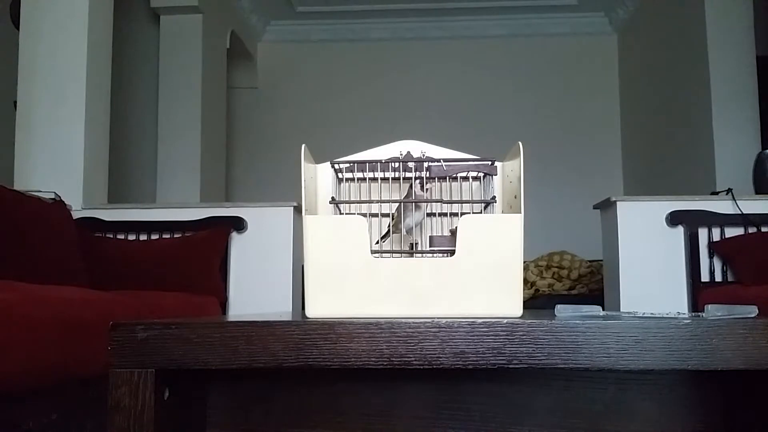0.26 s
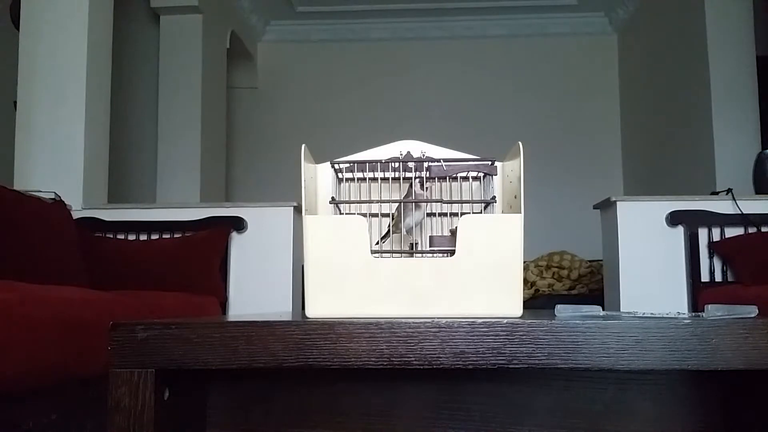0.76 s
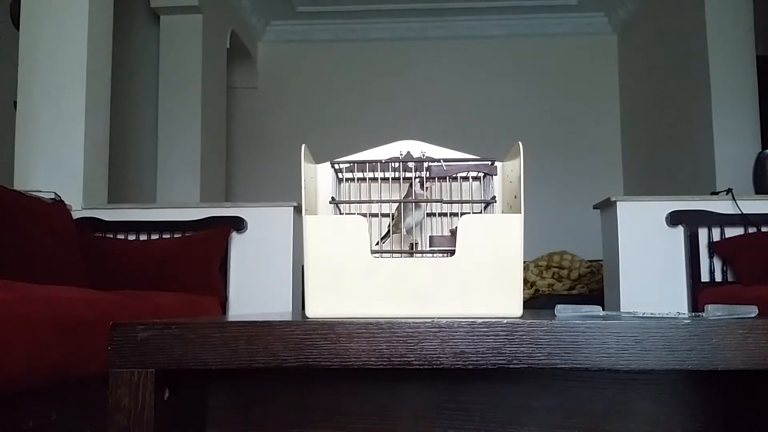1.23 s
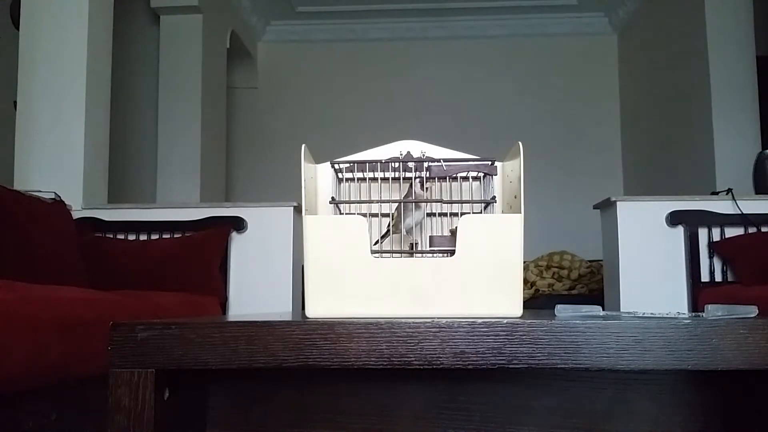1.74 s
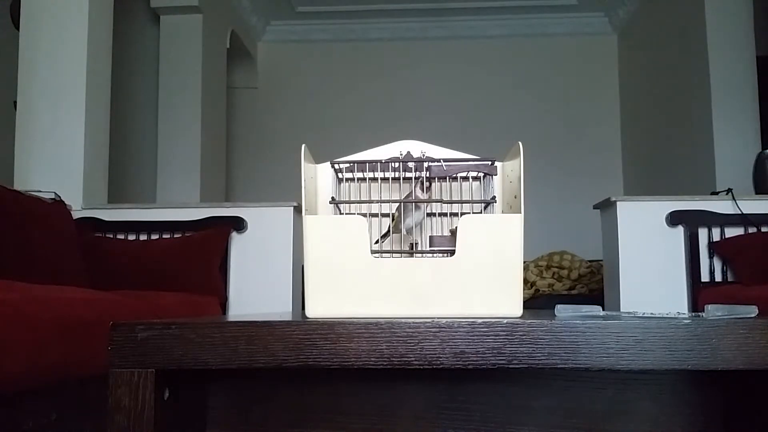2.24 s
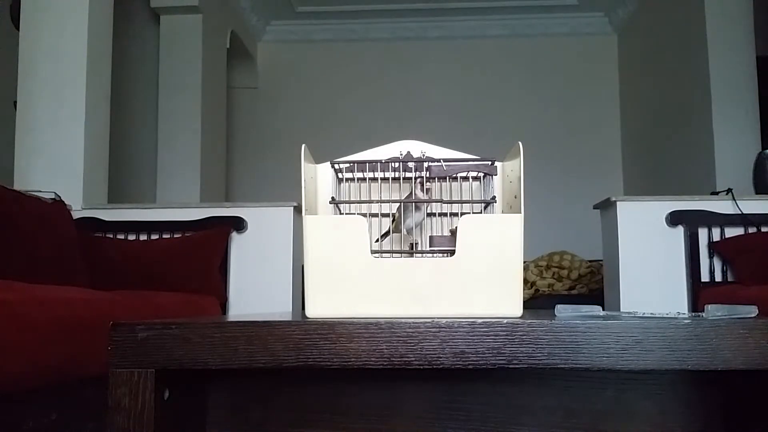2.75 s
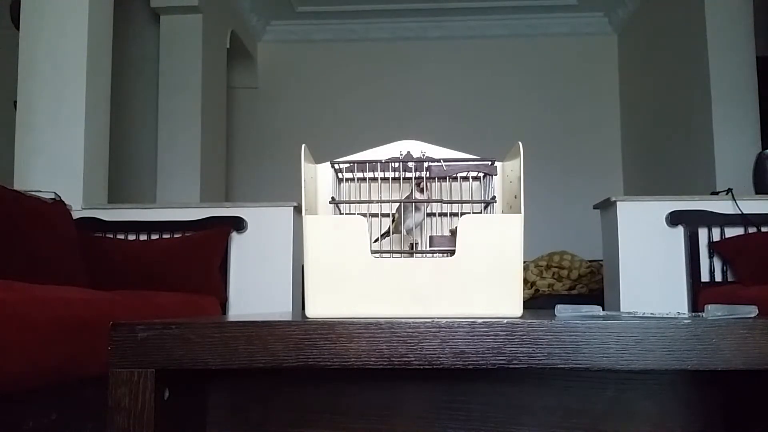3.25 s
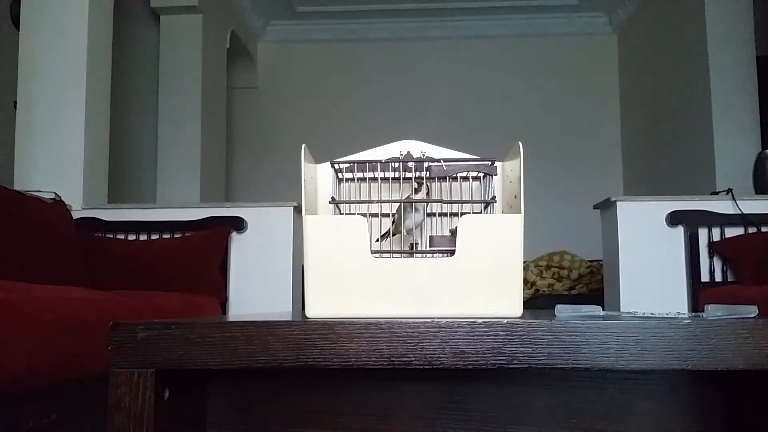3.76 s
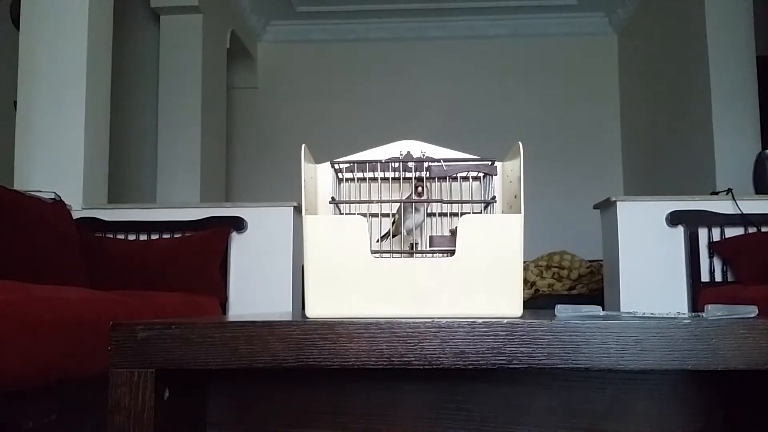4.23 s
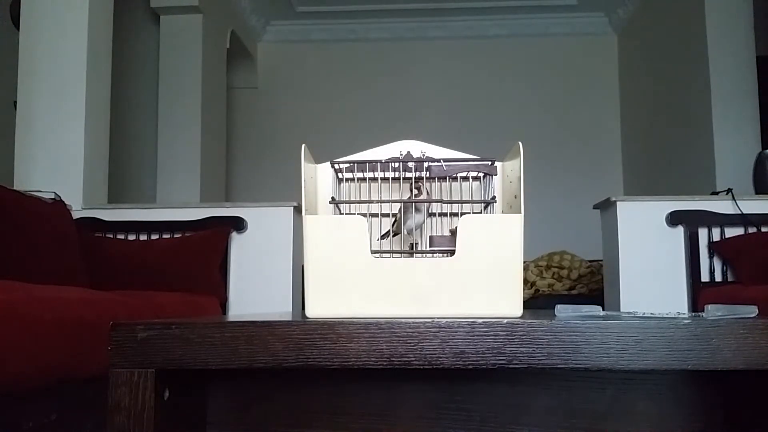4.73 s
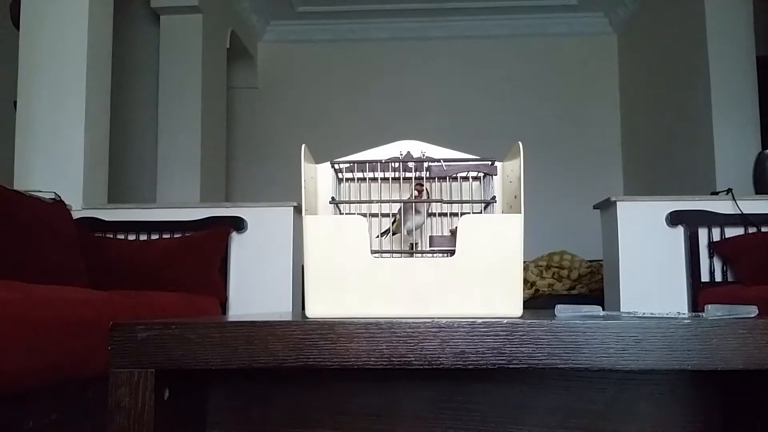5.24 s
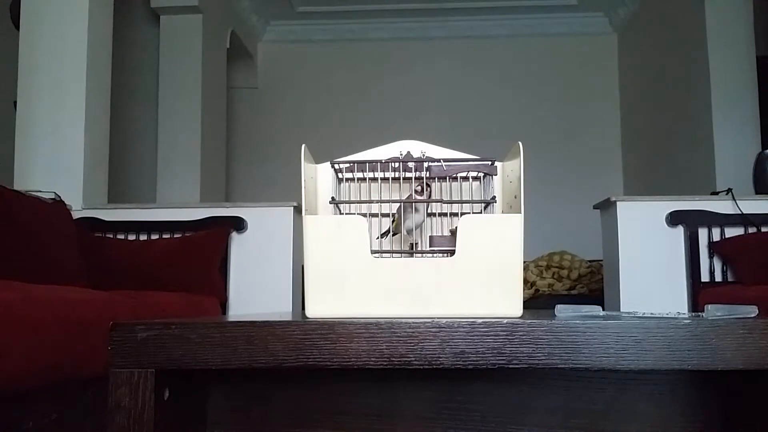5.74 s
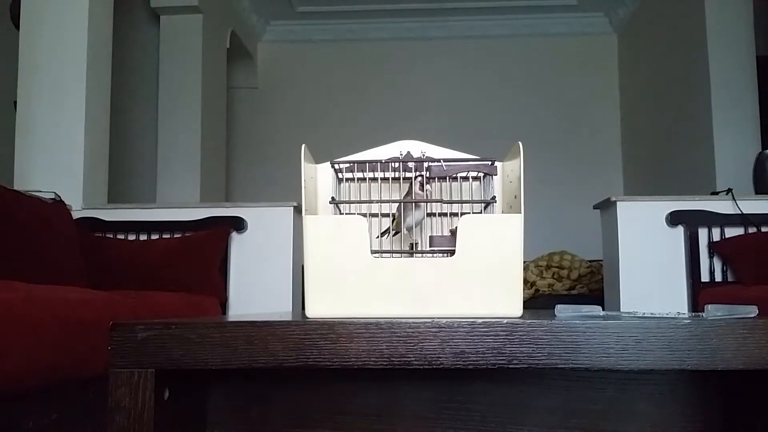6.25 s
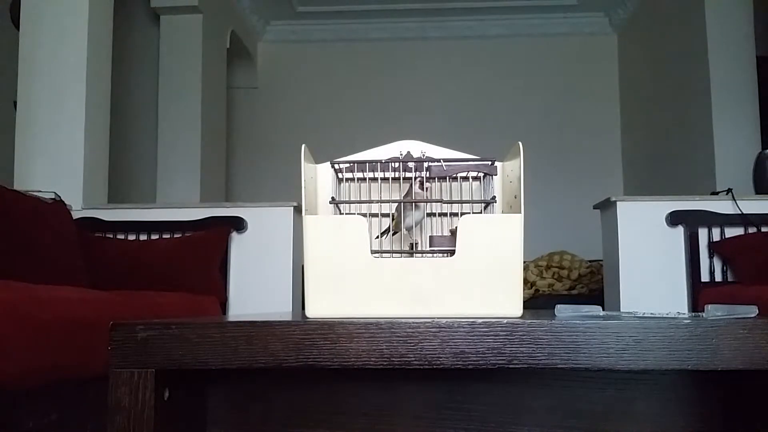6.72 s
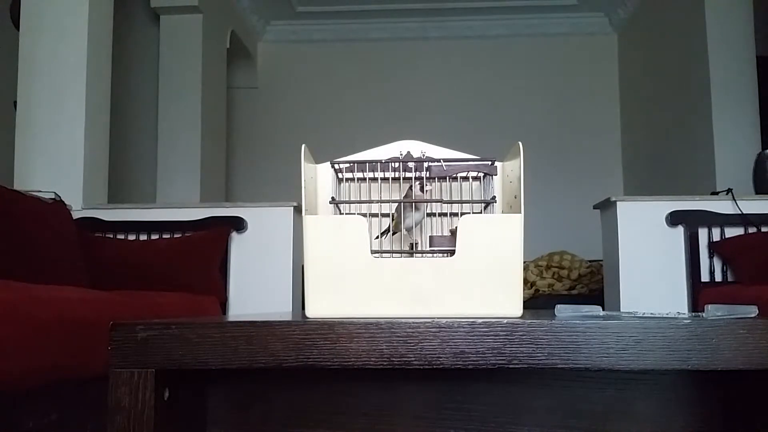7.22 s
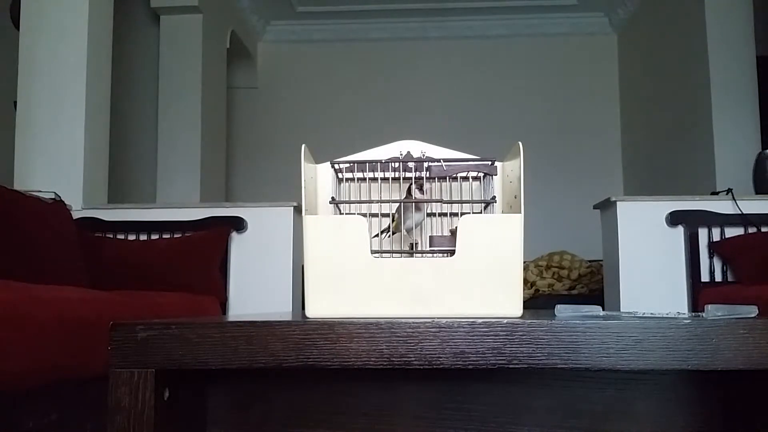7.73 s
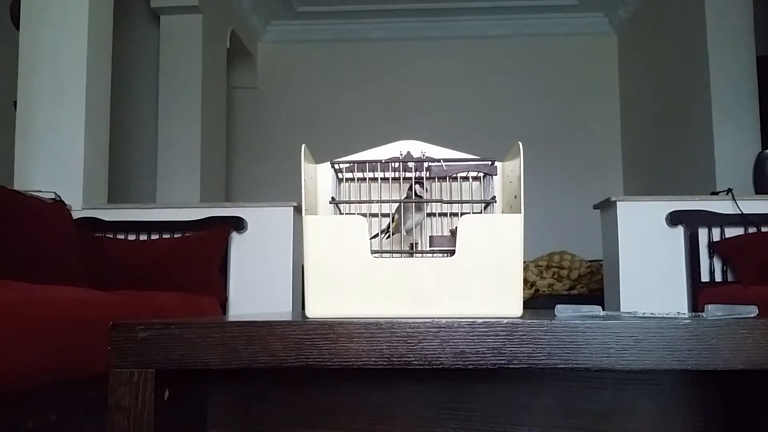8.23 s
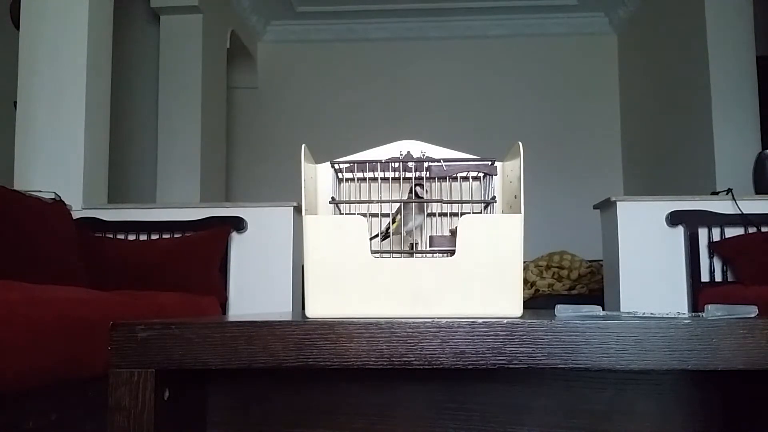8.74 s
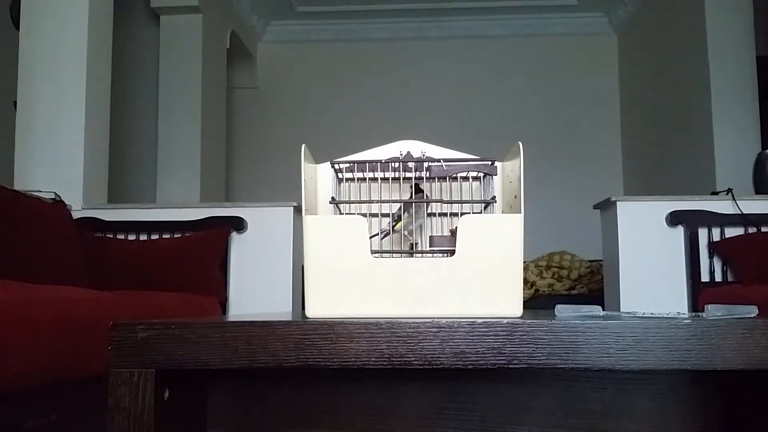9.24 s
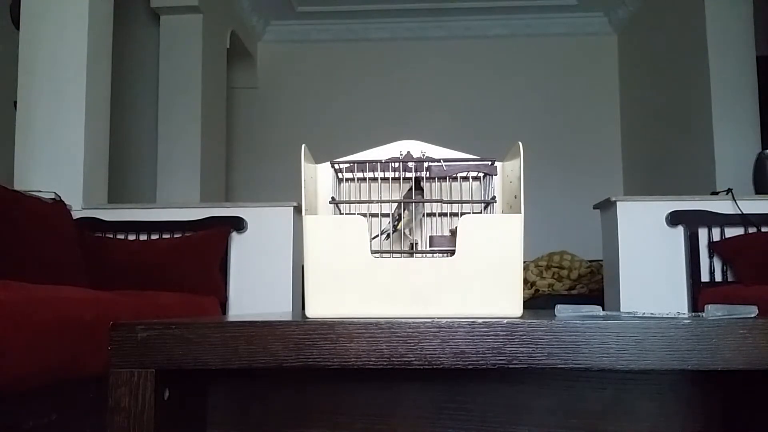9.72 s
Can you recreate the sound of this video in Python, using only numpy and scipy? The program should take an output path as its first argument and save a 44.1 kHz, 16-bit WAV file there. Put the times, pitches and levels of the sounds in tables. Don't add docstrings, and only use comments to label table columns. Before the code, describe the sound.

The first 1.6 seconds hold only faint hiss and muffled street rumble, with a low engine hum emerging. From about 1.7 seconds a small caged finch sings: three spaced groups of short rising chips and falling whistles, roughly 2.5 to 6.5 kHz, each louder, then from 2.6 quick hooks and dives, long downward slurs around 3.2 to 3.9, and sharp upward leaps with answering rises until 4.55. Dry beak and perch ticks are tucked between notes. Outside, a heavy vehicle's hum climbs, drops in pitch at 3.5 with a gear change, then climbs steadily from about 5 onward. Between 4.6 and 7.5 the bird is silent apart from a tiny tick, and the hiss recedes. The second song runs 7.5 to 9.65, softer and more reverberant, again accelerating, ending in tired falling slurs. Hard walls give a short bright echo; hiss and rumble lift with each song.

```python
import sys
import numpy as np
from scipy import signal
from scipy.io import wavfile
from scipy.ndimage import uniform_filter1d

SR = 44100
rng = np.random.default_rng(int(sys.argv[2]) if len(sys.argv) > 2 else 0)


def natural_amplitude(level_db):
    exponent = np.asarray(level_db, float) / 20
    return 10 ** exponent


def dump_mix(stems):
    frames = np.atleast_2d(stems).T
    limited = np.clip(frames, -1, 1)
    pcm = np.round(limited * 32767).astype(np.int16)
    wavfile.write(sys.argv[1], SR, pcm)


N = 440118
TURN_S = 6


def evened(x):
    return x / np.sqrt(np.mean(x ** 2) + 1e-20)


def read(points, hz):
    f, value = np.transpose(points)
    return np.interp(np.log(hz + 1), np.log(f + 1), value)


def add(mix, s, sound):
    part = mix[round(s * SR):][:len(sound)]
    part += sound[:len(part)]


def curves(rows):
    s, *columns = np.transpose(rows)
    t = np.arange(s[0], s[-1], 1 / SR)
    return s[0], [np.interp(t, s, c) for c in columns]


def drift(length, top_hz):
    t = np.arange(length)[::64] / SR
    slow = sum(np.sin(2 * np.pi * (f * t + rng.random())) for f in np.geomspace(top_hz / 8, top_hz, num=8))
    return np.interp(np.arange(length), np.arange(length)[::64], slow / 2)


def patchwork(shape, rows, columns):
    rough = uniform_filter1d(rng.standard_normal(shape), size=rows, axis=0)
    return evened(uniform_filter1d(rough, size=columns, axis=1))


def noise(spectrum, patchy_db):
    hz = np.fft.rfftfreq(1024, 1 / SR)
    a, b = rng.standard_normal((2, 513, N // 256 + 5))
    level_db = read(spectrum, hz)[:, None] + patchy_db * patchwork(a.shape, 10, 14)
    return evened(signal.istft((a + 1j * b) * natural_amplitude(level_db), nperseg=1024, noverlap=768)[1][:N])


def gate_opening(t):
    # starts to open t/s, starts to shut t/s
    spans = [
        (1.5, 4.62),
        (7.4, 9.6),
    ]
    open_s, shut_s = .5, .2
    return sum(np.clip(np.minimum((t - a) / open_s, 1 - (t - b) / shut_s), 0, 1) for a, b in spans)


def room_hiss(t, gate):
    # f/Hz, density/dB
    hiss = [(180, -31.5), (300, -4), (342, -14), (423, -14.5), (490, -9), (814, -12), (1130, -10),
            (4050, -22), (13800, -26), (15000, -28)]
    shut_db = -72 + .75 * t
    open_db = -58.5
    return natural_amplitude(shut_db + gate * (open_db - shut_db) + 3.5) * noise(hiss, patchy_db=.5)


def street_rumble(t, gate):
    # f/Hz, density/dB
    rumble = [(24, -41), (40, -1.5), (219, -7.5), (253, 2.5), (325, -25.5), (379, -6.5), (450, -27),
              (580, -55.5), (990, -120)]
    # t/s, level/dB
    traffic = [(0, -60.5), (1.5, -60.5), (2.7, -54), (4.7, -62), (6, -56.5), (7.4, -52.5), (8, -58),
               (9.98, -51)]
    gated_db = 5
    return natural_amplitude(np.interp(t, *np.transpose(traffic)) + gated_db * gate) * noise(rumble, patchy_db=1.97)


def gear(rows, column):
    # multiple of crank rate, low gear level/dB, later gears level/dB
    orders = [(1.33, -11.5, -5.5), (2.001, 4, -4.5), (3, -1, 4.5), (4, -13, -2.5), (5, -0.5, -3),
              (6, 0.4, 1.5), (7, -4.5, -1), (8, -0.5, -10), (9, -11.5, -15.5), (10, -15, -10.5)]
    # f/Hz, level/dB
    walls = [(55, -3.5), (74, 8.5), (92, 2.5), (108, 2), (130, 1.5), (155, -2.5), (178, -1), (200, -1),
             (250, 4.5), (290, 1.5), (340, -12.5), (450, -13)]
    # t/s, f/Hz, level/dB
    swells = [(2.2, 100, -5), (2.75, 190, -4), (2.1, 64, -7), (2.55, 73, 3), (3.15, 85, -5), (3.3, 255, 2),
              (4.3, 83, 6), (5.2, 182, 7), (6.9, 400, 8), (6.4, 113, .5), (7.0, 245, 6), (7.8, 270, 4),
              (8.05, 62, 9), (8.5, 295, 3), (8.9, 152, 6), (9.6, 72, -5), (1.7, 120, 6), (8.9, 101, 7),
              (9.1, 258, 4), (9.5, 215, 6), (5.6, 103, 6), (6.35, 224, 6), (6.2, 255, 4), (5.85, 243, 4),
              (7.3, 295, 5), (2.25, 275, 5), (2.6, 225, 4), (2.75, 117, 3), (7.6, 395, 6), (4.5, 200, -6),
              (4.6, 115, -6), (6.6, 195, 3), (1.3, 210, -5), (3.38, 80, 7), (3.85, 77, -4), (2.25, 68, -3),
              (9.5, 214, 4), (8.85, 100, 4), (7.0, 244, 3), (6.3, 112, 4), (9.3, 156, 3)]
    swell_s, swell_hz = .3, 12
    s, (crank_hz, load_db) = curves(rows)
    turn = 2 * np.pi * np.cumsum(crank_hz) / SR
    hum = np.zeros(len(turn))
    t = s + np.arange(len(turn)) / SR
    for k, *db in orders:
        waver_db = 2.2 * drift(len(turn), top_hz=2.8)
        for at, hz, lift_db in swells:
            waver_db += lift_db * np.exp(-((t - at) / swell_s) ** 2 - ((k * crank_hz - hz) / swell_hz) ** 2)
        level_db = load_db + db[column] + read(walls, k * crank_hz) + waver_db
        hum += natural_amplitude(level_db) * np.sin(k * turn + 2 * np.pi * rng.random())
    return s, hum * signal.windows.tukey(len(turn), .04)


def heavy_vehicle():
    # t/s, crank f/Hz, load level/dB
    gears = [
        [(.8, 25.27, -77), (1.5, 28.56, -66.5), (2.25, 34.3, -53), (2.85, 39.42, -49.5), (3.2, 43, -51),
         (3.5, 43, -60)],
        [(3.5, 24.27, -65), (4.5, 28.4, -58), (4.85, 29.2, -65), (5.4, 30.3, -63), (5.75, 30.9, -72)],
        [(5.1, 31, -72), (5.5, 33.2, -64), (6, 35.7, -62.5), (7, 40.8, -60.5), (8, 46.33, -56),
         (9.2, 52.27, -55.5), (9.98, 54.8, -61)],
    ]
    vehicle = np.zeros(N)
    for column, rows in enumerate(gears):
        add(vehicle, *gear(rows, min(column, 1)))
    return vehicle


def room(column):
    # f/Hz, t60/s
    decay = [(2500, .44), (3700, .39), (4500, .4), (7000, .35), (12000, .28)]
    # f/Hz, first song level/dB, turned away level/dB
    wet = [(2500, -9, -6.5), (3100, -11, -8.5), (3750, -5.5, -4), (4400, -11, -6.5), (5200, -8, -6),
           (6000, -10, -6), (6500, -12.5, -7), (9000, -3, -1)]
    # delay t/s, first song level/dB, second song level/dB
    echoes = [(.0021, -17, -18), (.0044, -20, -16), (.0057, -16, -17), (.0083, -20, -20), (.0127, -11, -17),
              (.0149, -16, -22), (.0158, -22, -16), (.019, -16, -22), (.030, -18, -22), (.0322, -18, -20)]
    patchy_db, early_db, early_s = 2.5, 2, .04
    taps = np.zeros(SR)
    at = np.arange(300, SR - 20, 20)
    taps[at + rng.integers(0, 20, len(at))] = rng.choice([-1., 1.], len(at))
    hz, t, z = signal.stft(taps, SR, nperseg=256)
    wet_db = read([(f, db[column]) for f, *db in wet], hz)[:, None]
    wet_db = wet_db + patchy_db * patchwork(z.shape, 3, 6) + early_db * np.exp(-t / early_s)
    decay_db = 60 * t / read(decay, hz)[:, None]
    path = signal.istft(z * natural_amplitude(wet_db - decay_db), SR, nperseg=256)[1]
    path /= np.sqrt(SR / 20 * .03)
    path[0] += 1
    for s, *db in echoes:
        path[round(s * SR)] += natural_amplitude(db[column])
    return path


def tick(s, hz, db, swell_s):
    t = np.arange(SR // 40) / SR
    window = np.hanning(round(.75 * swell_s * SR))
    rough = evened(signal.convolve(rng.standard_normal(len(t)), window, "same"))
    envelope = (t / swell_s) ** 2 * np.exp(2 - 2 * t / swell_s)
    return s, natural_amplitude(db) * envelope * rough * np.sin(2 * np.pi * hz * t)


def note(row, pitch, breath):
    # f/Hz, level/dB
    windpipe = [(2500, -.1), (3100, 1.5), (3550, -1.5), (4000, .1), (4500, .1), (5000, -1.5), (5600, .1),
                (6400, -.1)]
    # t/s, level/dB
    beak = [(1.6, 0.3), (3.0, 2.5), (3.4, -1), (3.95, -3), (4.02, 5), (4.6, 3), (7.5, 0.3), (8.4, 0.6),
            (9.1, 5), (9.6, 8)]
    # f/Hz, level/dB
    beak_colour = [(5500, 1), (7000, 3), (7900, -5), (8900, -1.5), (10200, 3), (12500, 2.5), (14000, 6),
                   (14800, 3)]
    # multiple of whistle, level/dB
    overtones = [(2, -40), (3, -49)]
    s, length_s, from_hz, to_hz, level_db = row
    bend_s, into_s, out_s, creep = pitch
    rise_s, rise_db, dip_s, dip_db, swell, fade, fade_db = breath
    lead = 88
    t = np.arange(-lead, round(length_s * SR)) / SR
    rise = rise_db * np.clip(1 - t / rise_s, 0, 1)

    bend = np.tanh((t - bend_s) / (2 * np.where(t < bend_s, into_s, out_s)))
    done = (bend - bend[lead]) / (bend[-1] - bend[lead])
    hz = from_hz + (to_hz - from_hz) * done + 1000 * creep * (t - length_s * done)
    hz -= 250 * (from_hz > max(to_hz, 5300)) * np.exp(-np.maximum(t, 0) / .004)

    dip_width_s = .006
    db = level_db + rise + dip_db * np.exp(-((t - dip_s) / dip_width_s) ** 2) + read(windpipe, hz)
    db += 1000 * swell * (t - length_s / 2) + fade_db * np.clip(1 - (1 - t / length_s) / fade, 0, 1)

    flutter_hz, flutter_db, flutter_bend = 62, 1.2, .004
    chance = rng.random()
    tremor = np.sin(2 * np.pi * (flutter_hz * (.7 + .6 * chance) * t + 7 * chance))
    db = db + flutter_db * tremor
    hz = hz * (1 + flutter_bend * tremor)
    turn = 2 * np.pi * (np.cumsum(hz) / SR + chance)

    beak_db = np.interp(s, *np.transpose(beak)) - 3.5 * np.log2(hz / 4000)
    beak_db += 1000 * -.15 * (t - .01) - .45 * rise
    tone = np.sin(turn)
    for k, d in overtones:
        tone = tone + natural_amplitude(d + beak_db + read(beak_colour, k * hz)) * np.sin(k * turn)
    edge = np.clip(np.minimum((t - t[0]) / .006, (t[-1] - t) / .004), 0, 1)
    edge = np.sin(np.pi / 2 * edge) ** 2
    return s + t[0], np.sqrt(2) * natural_amplitude(uniform_filter1d(db, size=90, mode="nearest")) * edge * tone


def rising_notes():
    # start t/s, length/s, from f/Hz, to f/Hz, level/dB
    chips = [
        (1.67, 0.029, 2590, 3076, -27.5),
        (1.966, 0.033, 2580, 3080, -20.5),
        (2.296, 0.037, 2604, 3072, -15.0),
        (7.544, 0.028, 2610, 3071, -25.5),
        (7.858, 0.031, 2650, 3091, -26.5),
        (8.185, 0.036, 2610, 3091, -25.5),
    ]
    # start t/s, length/s, from f/Hz, to f/Hz, level/dB
    flicks = [
        (2.593, .02, 2770, 3231, -13.5),
        (2.764, .021, 2580, 2953, -23),
        (2.939, .022, 2700, 2990, -21),
        (8.501, .017, 2910, 3189, -21.5),
        (8.677, .019, 2580, 3052, -29),
        (8.856, .019, 2560, 2980, -31),
        (9.047, .02, 2580, 2930, -24),
    ]
    # start t/s, length/s, from f/Hz, to f/Hz, level/dB
    graces = [
        (1.85, 0.016, 2760, 2821, -45.0),
        (3.116, 0.024, 2520, 2637, -35.0),
        (3.315, 0.024, 2522, 2633, -38.5),
        (3.526, 0.024, 2420, 2629, -40.0),
        (3.768, 0.026, 2300, 2449, -45.5),
        (9.24, 0.025, 2390, 2580, -34.0),
        (9.475, 0.024, 2430, 2554, -41.5),
    ]
    # start t/s, length/s, from f/Hz, to f/Hz, level/dB
    rises = [
        (1.745, 0.04, 3500, 3716, -29.0),
        (2.058, 0.056, 3450, 3737, -20.5),
        (2.376, 0.044, 3330, 3767, -17.0),
        (7.618, 0.027, 3550, 3696, -31.0),
        (7.946, 0.049, 3400, 3732, -21.5),
        (8.27, 0.059, 3450, 3810, -18.5),
        (2.62, 0.022, 3760, 4000, -19.5),
    ]
    # start t/s, length/s, from f/Hz, to f/Hz, level/dB
    hooks = [
        (8.516, 0.036, 3200, 3995, -15.5),
        (2.787, 0.043, 3140, 3987, -13.5),
        (2.963, 0.041, 3040, 3940, -15.5),
    ]
    # start t/s, length/s, from f/Hz, to f/Hz, level/dB
    flat_hooks = [
        (8.701, 0.041, 3200, 3921, -16.5),
        (8.882, 0.043, 3200, 3903, -17.5),
        (9.07, 0.044, 3150, 3940, -21.5),
    ]
    # start t/s, length/s, from f/Hz, to f/Hz, level/dB
    scoops = [
        (3.142, 0.043, 2950, 3661, -17.5),
        (3.342, 0.039, 2850, 3574, -16.0),
        (3.555, 0.043, 2800, 3412, -16.5),
        (3.797, 0.042, 3000, 3436, -18.0),
        (9.272, 0.047, 3010, 3522, -17.0),
        (9.5, 0.052, 2900, 3416, -21.5),
    ]
    # start t/s, length/s, from f/Hz, to f/Hz, level/dB
    answers = [
        (4.089, 0.061, 2910, 3956, -17.0),
        (4.295, 0.056, 2860, 3934, -17.0),
        (4.504, 0.054, 2960, 3893, -18.0),
    ]
    # start t/s, length/s, from f/Hz, to f/Hz, level/dB
    crests = [
        (2.616, .042, 3350, 4230, -12.5),
    ]
    return [(chips, (.007, .005, .004, .5), (.015, -17, .014, -1, .12, .2, -3)),
            (flicks, (.004, .005, .005, 2.5), (.009, -16, .011, -.5, -.03, .3, -5)),
            (graces, (.003, .003, .003, .5), (.009, -18, .009, .5, .05, .2, -2.5)),
            (rises, (.011, .005, .005, .1), (.0095, -17, .022, -3, .03, .2, -3)),
            (hooks, (.0095, .0036, .0033, .7), (.018, -12, .016, -2.5, .12, .15, -2.5)),
            (flat_hooks, (.01, .004, .0045, .3), (.022, -17, .024, -.5, .03, .25, -5)),
            (scoops, (.008, .0036, .0036, -.5), (.0075, -17, .024, -3.5, -.03, .2, -2.5)),
            (answers, (.011, .0065, .0065, 2.5), (.006, -18, .023, -6, -.05, .2, -4)),
            (crests, (.009, .0035, .0026, -7.5), (.014, -16, .03, -.1, -.03, .2, -3))]


def high_notes():
    # start t/s, length/s, from f/Hz, to f/Hz, level/dB
    steps = [
        (1.823, 0.049, 6090, 5584, -24.5),
        (2.137, 0.047, 6300, 5802, -19.5),
        (2.452, 0.044, 6420, 5791, -17.5),
        (7.703, 0.051, 6180, 5597, -30.0),
        (8.033, 0.052, 6200, 5589, -21.0),
        (8.352, 0.053, 6270, 5895, -18.0),
    ]
    # start t/s, length/s, from f/Hz, to f/Hz, level/dB
    falls = [
        (1.876, 0.049, 5210, 4364, -18.5),
        (7.763, 0.042, 4890, 4314, -19.0),
    ]
    # start t/s, length/s, from f/Hz, to f/Hz, level/dB
    slides = [
        (2.185, 0.065, 5230, 4313, -15.0),
        (2.497, 0.057, 5200, 4398, -14.0),
        (8.079, 0.061, 4950, 4364, -20.0),
        (8.397, 0.063, 5190, 4465, -20.5),
    ]
    # start t/s, length/s, from f/Hz, to f/Hz, level/dB
    clipped = [
        (3.205, 0.045, 5500, 4600, -14.0),
    ]
    # start t/s, length/s, from f/Hz, to f/Hz, level/dB
    swoops = [
        (2.674, 0.057, 6180, 4777, -17.5),
        (2.848, 0.066, 6200, 4947, -17.5),
        (3.022, 0.053, 6430, 4800, -15.5),
    ]
    # start t/s, length/s, from f/Hz, to f/Hz, level/dB
    dives = [
        (8.943, 0.06, 6200, 4850, -20.0),
        (9.132, 0.057, 6250, 4876, -24.0),
    ]
    # start t/s, length/s, from f/Hz, to f/Hz, level/dB
    slurs = [
        (3.402, 0.074, 5430, 4367, -12.5),
        (3.612, 0.102, 5280, 4378, -12.5),
        (3.855, 0.09, 5380, 4344, -13.0),
    ]
    # start t/s, length/s, from f/Hz, to f/Hz, level/dB
    drops = [
        (8.533, 0.042, 4450, 4116, -19.5),
        (8.76, 0.017, 6200, 5859, -25.5),
        (8.604, 0.04, 5500, 4874, -15.0),
        (8.778, 0.036, 5550, 4766, -19.0),
    ]
    # start t/s, length/s, from f/Hz, to f/Hz, level/dB
    sighs = [
        (9.334, 0.091, 5380, 4470, -21.0),
        (9.563, 0.085, 5050, 4218, -25.5),
    ]
    # start t/s, length/s, from f/Hz, to
    # f/Hz, level/dB
    pips = [(2.672, .016, 4500, 4650, -21), (2.846, .012, 4320, 4730, -21), (3.022, .009, 4290, 4560, -14),
            (8.76, .011, 4390, 4440, -24), (8.943, .012, 4500, 4630, -23), (9.133, .008, 4460, 4540, -22),
            (4.462, .016, 6220, 6300, -19), (3.994, .013, 3880, 4300, -15), (4.196, .016, 3980, 4300, -15),
            (4.406, .01, 4050, 4290, -19), (9.346, .016, 6080, 5240, -19), (8.581, .019, 6330, 6220, -26),
            (2.195, .016, 5750, 5200, -30), (1.884, .012, 5550, 5250, -38)]
    # start t/s, length/s, from f/Hz, to f/Hz, level/dB
    leaps = [
        (4.204, .058, 4300, 6330, -13.5),
        (4.413, .063, 4300, 6225, -14),
    ]
    # start t/s, length/s, from f/Hz, to f/Hz, level/dB
    climbs = [
        (4.004, .056, 4300, 6520, -15),
    ]
    return [(steps, (.023, .0035, .0035, .1), (.02, -18, .017, -2.5, .03, .2, -5)),
            (falls, (.004, .01, .009, -3), (.017, -17, .03, -.1, -.05, .15, -4)),
            (slides, (.012, .012, .012, -4), (.02, -15, .03, -.1, -.04, .15, -5)),
            (clipped, (.019, .005, .006, -2), (.028, -20, .012, 3, .1, .13, -5)),
            (swoops, (.023, .0042, .0048, -.7), (.026, -15, .03, 2.5, .03, .2, -3)),
            (dives, (.02, .0038, .0058, -.7), (.018, -14, .022, 4.5, -.03, .2, -3)),
            (slurs, (.02, .005, .0065, -1.2), (.034, -21, .013, 5.5, -.03, .13, -13)),
            (drops, (.003, .0055, .0055, -2.5), (.008, -16, .03, -.1, .03, .15, -4)),
            (sighs, (.022, .008, .0095, -1.5), (.012, -24, .014, 4.5, -.03, .2, -6)),
            (pips, (.004, .003, .003, 3), (.005, -14, .004, -.1, .03, .3, -5)),
            (leaps, (.007, .0027, .0036, .7), (.03, -17, .008, -4.5, -.03, .2, -4)),
            (climbs, (.006, .0027, .0036, 6), (.018, -15, .008, -4.5, .12, .15, -2.5))]


def husky(x):
    husk_db, husk_hz = -33, 300
    air = signal.lfilter([1], [1, -np.exp(-2 * np.pi * husk_hz / SR)], rng.standard_normal(N))
    return x * (1 + natural_amplitude(husk_db) * evened(uniform_filter1d(air, size=12)))


def finch_in_room():
    # t/s, centre f/Hz, level/dB, swell/s
    ticks = [(1.764, 4150, -46, .0032), (1.777, 4150, -44, .0036), (2.101, 4170, -38, .004),
             (2.42, 4360, -34.5, .004), (3.189, 4190, -36.5, .004), (3.606, 3950, -40, .004),
             (4.048, 3300, -25.5, .006), (4.205, 4700, -33, .005), (4.415, 4700, -35, .005),
             (4.125, 4500, -38, .004), (4.33, 4400, -38, .004), (4.525, 4300, -38, .004),
             (4.875, 3250, -55, .0016), (7.641, 4200, -45, .003)]
    finch = np.zeros(N)
    for row in ticks:
        add(finch, *tick(*row))
    for rows, pitch, breath in rising_notes() + high_notes():
        for row in rows:
            add(finch, *note(row, pitch, breath))
    finch = husky(finch)
    turned = np.arange(N) > TURN_S * SR
    return sum(signal.oaconvolve(finch * (turned == column), room(column))[:N] for column in (0, 1))


def scene():
    t = np.arange(N) / SR
    gate = gate_opening(t)
    floor = room_hiss(t, gate) + street_rumble(t, gate)
    return (floor + heavy_vehicle() + finch_in_room())[None]


def starved(x, step_db):
    # f/Hz, level/dB
    coarse = [(400, -70), (900, -50), (2300, -46), (2900, -60), (6300, -52), (6900, -40), (10000, -40.5),
              (15000, -41)]
    hz, t, z = signal.stft(x, SR, nperseg=2048, noverlap=1024)
    bands = z[:1024].reshape(64, 16, -1)
    loudest = uniform_filter1d((abs(bands) ** 2).mean(1).max(0), size=5)
    luck = evened(uniform_filter1d(rng.standard_normal((64, 1, len(t))), size=2, axis=2))
    band_hz = hz[:1024].reshape(64, 16, 1)
    coarse_db = read(coarse, band_hz.mean(1, keepdims=True))
    coarse_db = coarse_db + 1 * (t > TURN_S)
    step = np.sqrt(abs(loudest)) * natural_amplitude(coarse_db + step_db * luck) + 1e-12
    z[:1024] = (step * np.round(bands / step)).reshape(1024, -1)
    return signal.istft(z, SR, nperseg=2048, noverlap=1024)[1][:N]


def low_pass(x):
    return signal.sosfilt(signal.butter(12, 14850, fs=SR, output="sos"), x)


def record(dry):
    treble = signal.butter(6, 6800, "high", fs=SR, output="sos")
    bass_cut = signal.butter(4, 52, "high", fs=SR, output="sos")
    bend = signal.sosfilt(treble, dry[0] ** 2)
    x = signal.sosfilt(bass_cut, dry[0] + natural_amplitude(-26) * bend)
    return low_pass(starved(x, step_db=5.0)[None])


dry = scene()
out = record(dry)
dump_mix(out)
```